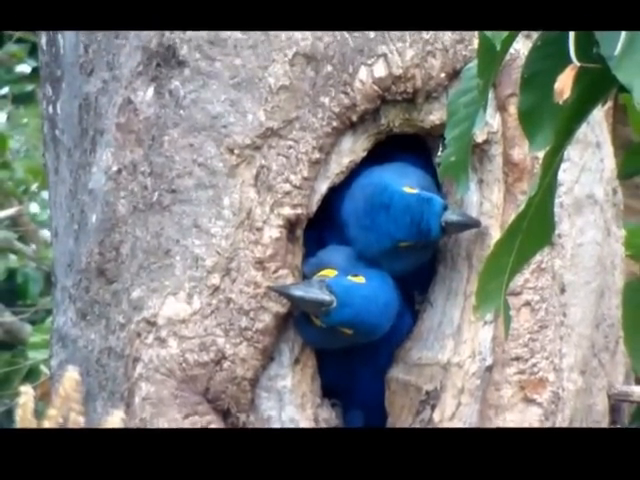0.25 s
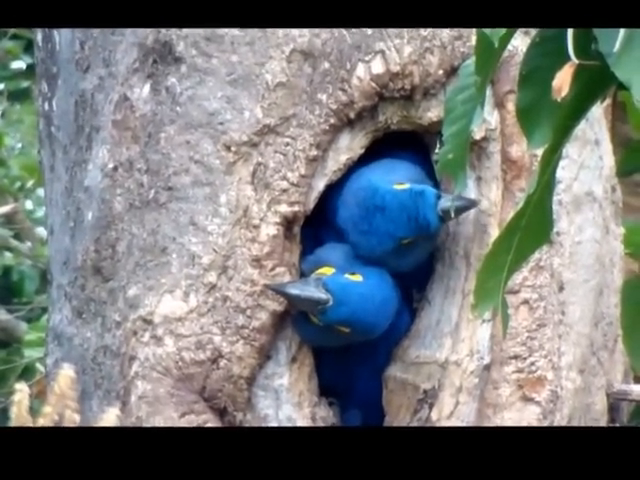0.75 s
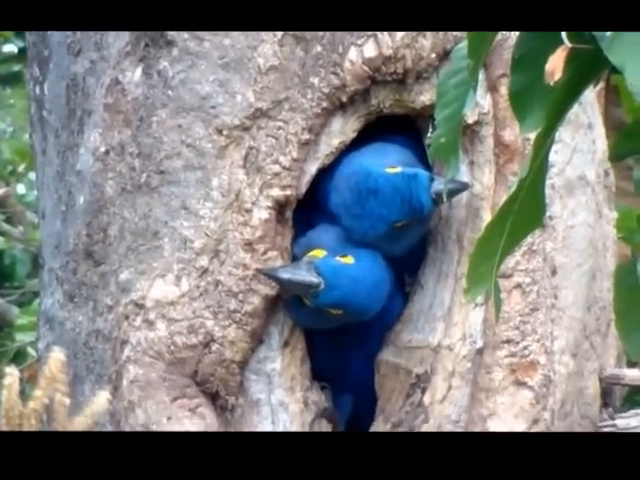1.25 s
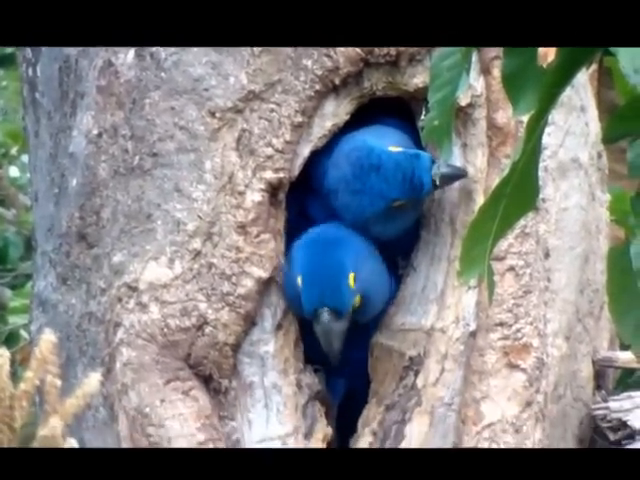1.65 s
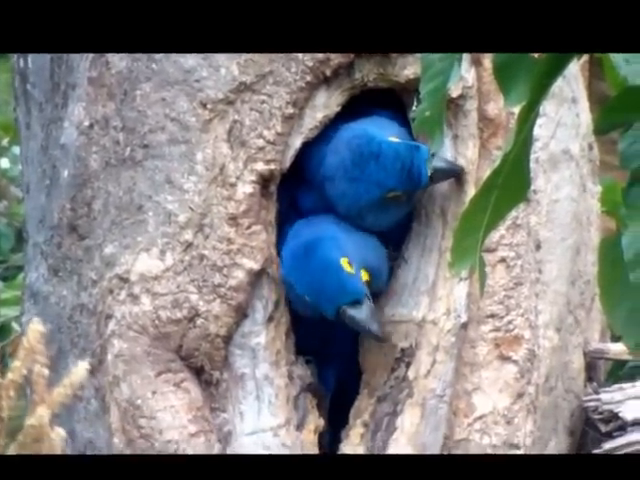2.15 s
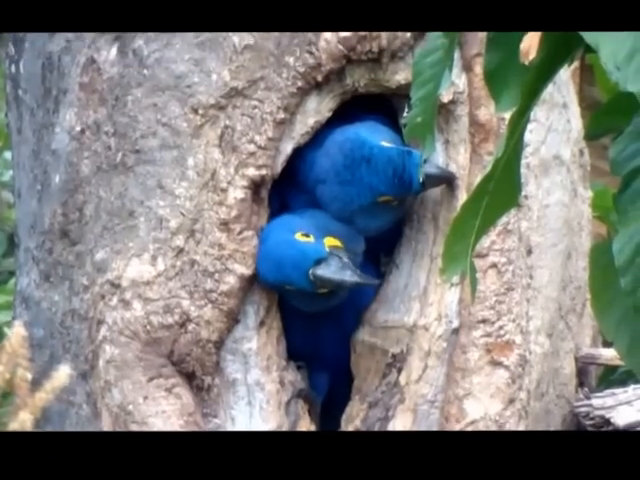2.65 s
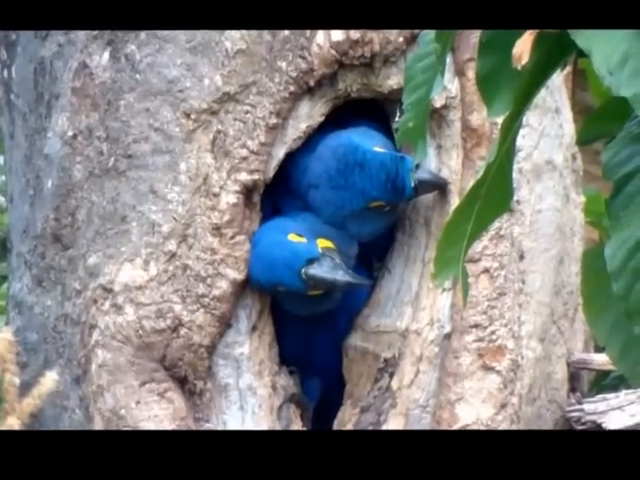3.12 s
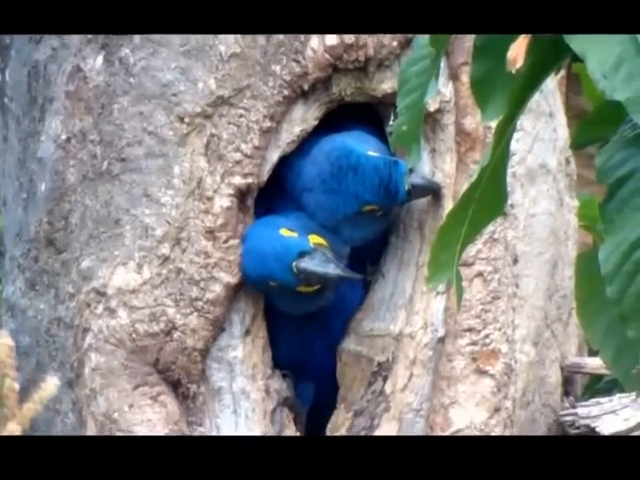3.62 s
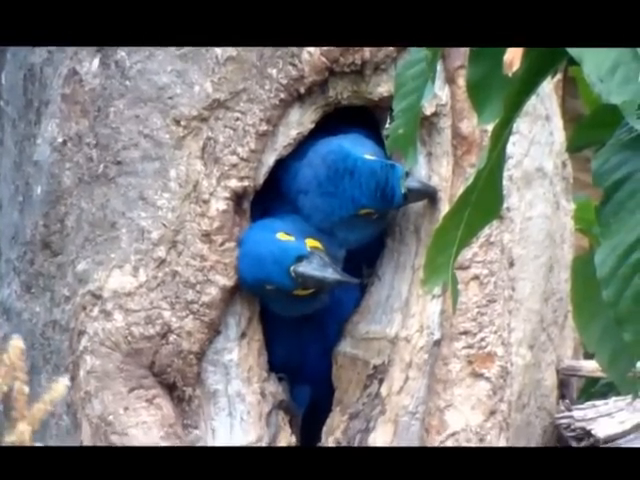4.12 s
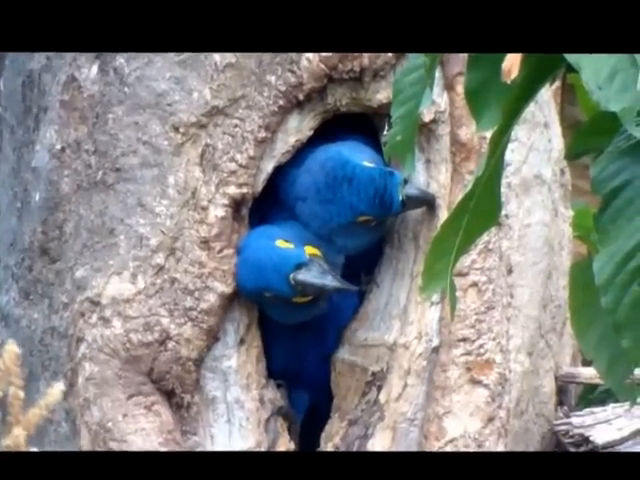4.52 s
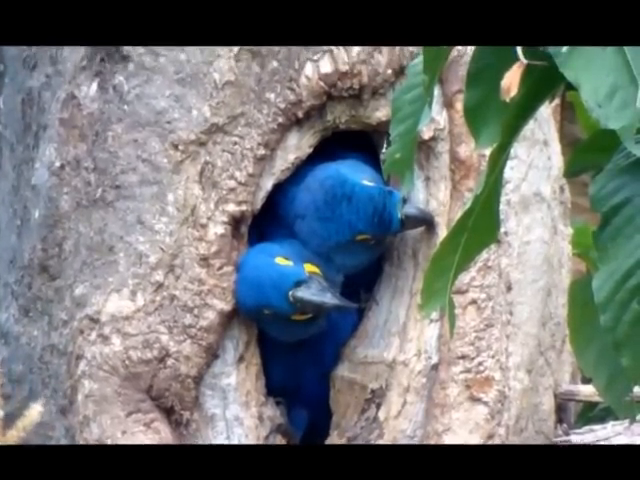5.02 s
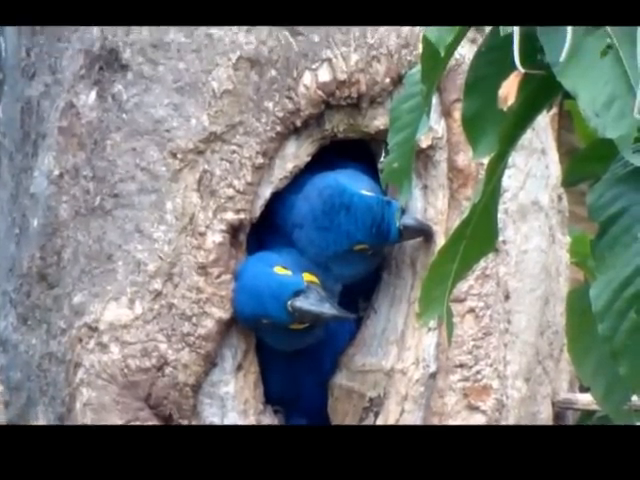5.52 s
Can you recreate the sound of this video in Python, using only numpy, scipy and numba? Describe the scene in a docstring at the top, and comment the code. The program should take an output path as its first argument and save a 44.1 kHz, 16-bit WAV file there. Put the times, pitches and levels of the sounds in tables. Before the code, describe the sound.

Harsh throbbing parrot croak near the start, then faint birds and farther parrots in a wood with chirping cricket, cicada buzz and wind thumps.

```python
"""In a wood, a parrot in a tree hole croaks loudly close to a small camera with two microphone ports.
Its voice, like those of farther parrots, is a pulse train shaped by resonances; songbirds whistle near-sines.
A cricket's keyed tone chirps in phrases over narrow cicada noise; leaves rustle as bursts of noise grains.
Low-passed noise and short pressure swings make wind rumble and thump on the ports."""
import sys
import numpy as np
from scipy import signal
from scipy.io import wavfile
from scipy.ndimage import uniform_filter1d
from numba import njit

SR = 44100
rng = np.random.default_rng(int(sys.argv[2]) if len(sys.argv) > 2 else 0)


def wav_out(sig):
    """Save sig, one row per channel (or a flat mono array), as 16-bit PCM at SR to the path in sys.argv[1]."""
    wavfile.write(sys.argv[1], SR, np.round(np.clip(np.atleast_2d(sig).T, -1, 1) * 32767).astype(np.int16))


N = 254010


def near_parrot():
    """Source and filter: throbs of the airway pinch the pulses, restart them high and let the pitch sag."""
    # membrane motion in a grunt, a croak and a yelp: (time [s], pulse rate [Hz], level [dB])
    call = [
        [(.315, 270.8, -54), (.325, 270.6, -35), (.341, 270.3, -27), (.349, 261.1, -43), (.357, 262, -42)],
        [(.36, 252.6, -20.5), (.372, 252.1, -15), (.395, 253.9, -13.5), (.43, 298.8, -11.5), (.53, 289.7, -12),
         (.68, 262.1, -14), (.775, 272.1, -10.5), (.792, 249.6, -22.5), (.885, 231.7, -26.5)],
        [(.894, 415.8, -26), (.91, 463.3, -27.5), (.93, 484.3, -29.5), (.95, 457.6, -25.5), (.98, 320, -26),
         (1.0, 394, -26), (1.028, 402.6, -26.5), (1.043, 357, -37), (1.052, 340, -64)],
    ]
    # roughness at the start of each part: (roughness [0-1])
    call_rough = [.64, .24, 0.16]
    # mouth: (time [s], throat [Hz], beak [Hz], beak level [dB], upper tract pitch [factor])
    mouth = [(.35, 1350, 2100, -22, 0.76), (.404, 1415, 2080, -15, 0.78), (.412, 1450, 2000, -18, 1.034),
             (.47, 1460, 1960, -19, 1.1), (.58, 1362, 2360, -14.5, 0.98), (.78, 1383, 2584, -12.5, 1.05),
             (.80, 1570, 2400, -52, 1.07), (.92, 1660, 1870, -11, 0.88), (1.05, 1624, 1940, -17, 0.99)]
    # upper resonances: (centre [Hz], width [Hz], level [dB])
    upper_tract = [(2625, 210, -22), (3570, 510, -18.5), (4390, 230, -28), (5250, 280, -25),
                   (6390, 470, -28), (7500, 680, -37.5), (9000, 5800, -46)]
    # airway constrictions in the croak: (time of the deepest point [s], depth of the dip [0-1])
    throbs = [(.408, 0.4), (.445, .35), (.481, 0.3), (0.516, 0.45), (.553, 0.2), (.587, 0.56), (0.621, 0.3),
              (.657, 0.26), (.692, 0.32), (.731, 0.6), (.768, 0.65)]
    throb_dip_s, throb_glide, throat_sag = .009, .09, .07  # glide and sag: share either side of the mean
    tires_per_s, roughest, tail_rough = 1.1, .43, .32
    throat_width_hz, beak_width_hz = 390, 300
    treble_start_db, treble_fades_s, treble_fade_db_per_s = -1.5, 0.846, 140

    t = np.arange(N) / SR
    hz, db, gate = read(sum(call, []))
    throat_hz, beak_hz, beak_db, stretch, _ = read(mouth)

    # the croak grows rougher up to a limit; the yelp is clear only on its arch
    grunt, croak, yelp = np.clip(call_rough, 0, 1)
    tired = np.clip(croak + tires_per_s * (t - throbs[0][0]), croak, roughest)
    grunt_end, lets_go, yelp_start = call[0][-1][0], call[1][-2][0], call[2][0][0]
    arch = (t > yelp_start) * (t < call[2][4][0])
    after_croak = np.where(arch, yelp, tail_rough)
    rough = np.where(t < grunt_end, grunt, np.where(t < lets_go, tired, after_croak))

    # the airway narrows gradually and reopens four times as fast
    start, depths = np.clip(np.transpose(throbs), 0, 1)
    airway = np.ones(N)
    for s, depth in zip(start, depths):
        dip_s = np.where(t < s, throb_dip_s, throb_dip_s / 4)
        airway *= 1 - depth * np.exp(-((t - s) / dip_s) ** 2)
    # position within a throb, held half-way (no glide) outside the throbs
    turn = np.interp(t, start, np.arange(len(throbs)), left=-.5, right=-.5) % 1
    sag = 1 - 2 * turn
    source, hum = syrinx(hz * (1 + throb_glide * sag), rough)
    throat_hz = throat_hz * (1 + throat_sag * uniform_filter1d(sag, size=200))

    # a third pole keeps the valley under the throat dark
    throat = svf(band(source, throat_hz, throat_width_hz), throat_hz, 530.0)
    voice = throat - undb(beak_db) * band(source, beak_hz, beak_width_hz)
    # torn air roughens the overtones
    rasp = source + 1.3 * rough * undb(4 * walk(200)) * rng.standard_normal(N)
    treble_db = treble_start_db - treble_fade_db_per_s * np.maximum(t - treble_fades_s, 0)
    voice += undb(treble_db) * tract(rasp, upper_tract, shift=0.027, wander_db=2.5, stretch=stretch)
    voice = voice / np.sqrt(uniform_filter1d(voice ** 2, size=2600)) * undb(db)

    # the chest hums about as loud whatever the effort, but drops 3 dB between croak and yelp
    chest = undb(-37.5 + 1.4 * walk(42.2)) * hum * airway
    chest = chest + level(band(source, 495, 260), -40.5)
    chest = chest * undb(-3 * (t > lets_go) * (t < yelp_start))
    chest = chest * undb(np.minimum(db + 26.0, 0))
    return (voice + chest) * airway * gate


def far_parrots():
    """Source and filter again: rougher pulses, throbbing in pitch and level, excite other throats."""
    # one list per call: (time [s], pulse rate [Hz], level [dB])
    calls = [
        [(3.335, 301, -49), (3.43, 314.2, -44), (3.47, 333, -36), (3.505, 311.4, -52), (3.58, 307.5, -56),
         (3.625, 302, -75)],
        [(4.455, 281.4, -55), (4.47, 279.7, -46), (4.502, 279.3, -48.5), (4.509, 280, -34.5),
         (4.62, 290.5, -35), (4.74, 271.9, -40), (4.87, 299.7, -36), (4.915, 300.7, -41.5)],
    ]
    # throat resonances, one list per call: (centre [Hz], width [Hz], relative level [dB])
    throats = [
        [(330, 180, -11.5), (1580, 205, -1.5)],
        [(618, 137, 7), (1117, 143, 4.5), (1460, 400, 4.5), (2080, 760, -4.5), (3650, 380, -11.5)],
    ]
    # roughness of each call: (roughness [0-1])
    roughness = [.75, .37]
    throb_mean_hz, throb_db = 28.74, 2
    out = 0
    for call, modes, rough in zip(calls, throats, roughness):
        hz, db, gate = read(call)
        throb = np.sin(2 * np.pi * np.cumsum(throb_mean_hz * (1 + 0.17 * walk(10))) / SR)
        source, _ = syrinx(hz * (1 + 0.04 * throb + .02 * walk(18)), rough)
        voice = level(tract(source, modes, shift=0.021, wander_db=1.1), 0)
        out = out + voice * undb(db + throb_db * throb) * gate
    return out


def songbirds():
    """Frequency modulation of near-sines: an arched note, a warble and slurred chirps, with early echoes."""
    # arched whistle: (time [s], pitch [Hz], level [dB], level of the line a fifth above [dB])
    arched = [(3.125, 2840, -64, -58), (3.146, 2980, -55, -49), (3.175, 3140, -50.5, -56),
              (3.24, 3265, -54, -45), (3.3, 3335, -52.5, -48.5), (3.39, 3224, -51, -44.5),
              (3.50, 3020, -57, -55), (3.64, 2680, -68, -56)]
    # a second bird's two notes, a flick and a trill settling on one pitch: (time [s], pitch [Hz], level [dB])
    warble = [
        [(3.67, 3000, -66), (3.7, 3400, -49), (3.715, 3400, -51), (3.73, 2800, -45), (3.82, 2710, -54),
         (3.85, 2710, -63)],
        [(3.86, 2900, -52), (3.897, 2965, -41), (3.925, 2200, -53), (3.965, 3203, -39), (4.035, 2205, -49.5),
         (4.078, 2756, -41.5), (4.15, 2738, -49), (4.21, 2735, -65), (4.24, 2730, -65)],
    ]
    # slurs: (time [s], length [s], from [Hz], to [Hz], level [dB], octave relative to it [dB])
    chirps = [(1.585, 0.087, 2250, 1703, -52.5, -1), (1.821, 0.067, 1800, 1860, -48, -3.5),
              (1.94, 0.046, 1300, 798, -52, 3.5), (2.135, 0.067, 2120, 1490, -51.5, -3),
              (2.778, 0.068, 2165, 1500, -54, 0), (3.437, .04, 4990, 4830, -49, -20),
              (3.546, 0.062, 3200, 2860, -48, -18), (5.631, 0.047, 2920, 2660, -48.5, -21),
              (5.564, 0.034, 4080, 4080, -52, -18), (5.645, 0.027, 4060, 4100, -51, -20),
              (5.72, 0.037, 3500, 3250, -50.5, -20)]
    # near trunks return the song: (delay [s], level [dB])
    echoes = [(.024, -11), (.047, -12.5)]
    hz, db, fifth_db, gate = read(arched)
    turn = whistle(hz, 0.0014)
    note_pair = undb(db) * np.sin(turn) + undb(fifth_db) * np.sin(turn * 3 / 2)
    out = gate * undb(1.2 * walk(37)) * note_pair
    for note in warble:
        hz, db, gate = read(note)
        out += gate * undb(db + 3.2 * walk(70)) * np.sin(whistle(hz, 0.00698))
    for s, length, from_hz, to_hz, chirp_db, octave_db in chirps:
        u = np.linspace(0, 1, int(length * SR))
        hz = to_hz + (from_hz - to_hz) * (1 - u) ** 1.4  # the slur slows toward its end
        turn = 2 * np.pi * np.cumsum(hz) / SR
        shape = undb(chirp_db) * np.sqrt(np.abs(np.sin(np.pi * u)))
        i = min(int(s * SR), N - len(u))
        out[i:i + len(u)] += shape * (np.sin(turn) + undb(octave_db) * np.sin(2 * turn))
    out = out * undb(2.35 * walk(60))
    delayed = [undb(db + 2.9 * walk(30)) * np.pad(out, (int(s * SR), 0))[:N] for s, db in echoes]
    return out + sum(delayed)


def cricket():
    """Amplitude keying: wing strokes gate a tone; each phrase starts slightly weak and flat and climbs to pitch."""
    # phrases: (start [s], length [s])
    phrases = [(-.2, 0.91), (0.929, 0.51), (1.944, 0.6), (3.016, 0.57), (4.117, .546), (5.22, 0.44)]
    tone_hz, stroke_rate_hz, start_drop = 6212, 34.3, 0.038  # drop: share of the pitch
    t, out = np.arange(N) / SR, 0
    for start, length in phrases:
        rise = np.clip((t - start) / 0.089, 0, 1)
        part = np.clip(((t - start) * stroke_rate_hz % 1) / 0.69, 0, 1)  # silent for the rest of the period
        stroke = np.clip(3.0 * np.sin(np.pi * part), 0, 1)
        hz = tone_hz * (1 - start_drop * (1 - rise) + 0.00296 * walk(120))
        gain = undb(-48.0794 - 1.65 * (1 - rise) + 0.96 * walk(50))
        gate = (t > start) * (t < start + length)
        out = out + gain * stroke * gate * np.sin(2 * np.pi * np.cumsum(hz) / SR)
    return out


def cicadas():
    """Amplitude-modulated narrow noise: one buzzing band that swells, over a broader chorus."""
    # swells: (centre time [s], half length [s], rise [dB])
    swells = [(1.003, 0.18, 5), (2.364, 0.19, 7), (3.7, 0.22, 7), (5.15, 0.49, 3)]
    t = np.arange(N) / SR
    db = -56.5 + sum(rise_db * np.exp(-((t - s) / half) ** 4) for s, half, rise_db in swells)
    buzz = np.sin(2 * np.pi * np.cumsum(43.6 * (1 + 0.059 * walk(5.2))) / SR)
    chorus_db = -54 + 1.0 * walk(3.32)
    chorus = undb(chorus_db) * around(5390 * (1 + 0.011 * walk(2.6)), 660, 0.99)
    return undb(db + 2.0 * buzz) * around(4670 * (1 + .006 * walk(3)), 295, 0.74) + chorus


def rustles():
    """Granular noise: brief bursts of dense leaf grains, partly alike on the two ports."""
    # bursts: (centre time [s], level [dB], length [s])
    bursts = [(1.241, -44, 0.019), (1.39, -49, 0.025), (1.433, -45.5, 0.04), (1.633, -53, 0.13),
              (1.685, -50, .02), (2.135, -53, 0.089)]
    t = np.arange(N) / SR
    shape = sum(undb(db) * np.exp(-((t - s) / (length / 2)) ** 2) for s, db, length in bursts)
    shared, *separate = rng.standard_normal((3, N)) * undb(1.94 * walk(340))
    grains = np.array([band(own + shared, 7500.0, 12000.0) for own in separate])
    return shape * level(grains, 0)


def wind():
    """Turbulent pressure: eddies rumble on each port alone; single gusts press the membranes about a cycle."""
    # thumps: (time 0.6 cycle ahead of the peak [s], peak level [dB], swing rate [Hz], left minus right [dB])
    thumps = [(1.549, -26, 212, 0), (2.545, -23, 111, -9), (3.118, -29.5, 70, 11),
              (3.968, -17.5, 76.5, 7.5), (4.26, -29, 67.3, 22), (4.309, -28, 98, 11),
              (4.347, -27, 62.3, -20), (4.565, -22, 74, 6), (4.786, -23, 64.84, -10), (5.08, -27, 65, 11),
              (5.204, -24.5, 58.5, 12), (5.62, -19, 126, -3)]
    low = signal.butter(1, [25, 90], "bandpass", fs=SR, output="sos")
    steep = signal.butter(2, 200, fs=SR, output="sos")
    lumps_db = 2.5 * np.array([walk(22.81), walk(25.12)])
    eddies = signal.sosfilt(np.vstack([low, steep]), rng.standard_normal((2, N)) * undb(lumps_db))
    out = level(eddies, 0) * undb(gusts() + np.array([[3.5], [1.5]]))
    for s, peak_db, hz, side_db in thumps:
        u = (np.arange(N) / SR - s) * hz - .6
        gain = undb(peak_db + np.array([[side_db], [-side_db]]) / 2)
        # the eddy reaches the second port out of step
        swing = np.array([-np.cos(2 * np.pi * u), np.cos(2 * np.pi * u - 1.4)])
        out += gain * np.exp(-(u / .5) ** 2) * swing
    return out


def gusts():
    """Wind envelope in dB, before the port offsets: calm, with gusts that rise fast, hold and die slowly."""
    # gusts: (time at full strength [s], held [s], level before the port offsets [dB])
    table = [(2.24, 0.19, -44), (3.95, .4, -34.5), (5.7, .2, -35.5)]
    calm_db, rise_db_per_s, fall_db_per_s = -51, 71, 12.5
    t, curves = np.arange(N) / SR, []
    for s, held, db in table:
        before, after = np.maximum(s - t, 0), np.maximum(t - s - held, 0)
        curves.append(np.maximum(db - rise_db_per_s * before - fall_db_per_s * after, calm_db))
    return np.max(curves, axis=0)


def wood():
    """Band-shaped noise: third-octaves of distant leaves and air swell together and flicker alone."""
    # spectrum: (frequency [Hz], relative density [dB per Hz])
    spectrum = [(150, -6), (400, -5), (1000, -9.5), (2500, -12), (4000, -15), (6500, -17.5), (9000, -21.5),
                (13000, -24), (15500, -28)]
    # leaf hiss over time: (time [s], level change [dB])
    stir = [(0, -1.5), (.8, 6), (1.6, 4.5), (2, 0), (5.76, 1.4)]
    corner_hz, density_db = np.transpose(spectrum)
    out, swell = 0, walk(0.69)
    for hz in 150 * 2 ** (np.arange(21) / 3):
        db = np.interp(np.log(hz), np.log(corner_hz), density_db) + 10 * np.log10(hz)
        db = db + 0.13 * swell + 1.52 * walk(9.5)
        side = np.interp(np.log(hz), np.log([200, 1000, 6000]), [.5, .4, .7])
        out = out + undb(db) * around(hz, hz / 4, side)
    return level(out, -49) * undb(read(stir)[0])


def syrinx(hz, rough):
    """Pulsed membrane: rough pulses wander in period and size and carry a puff of air; also the fundamental."""
    rough = np.clip(rough, 0, 1)
    cycles = np.cumsum(hz * (1 + 0.13 * rough * walk(150))) / SR
    chance = rng.standard_normal(N // 20)[cycles.astype(int)]  # one draw per cycle
    onsets = np.diff(np.floor(cycles), prepend=0)
    pulses = onsets * np.sqrt(SR / hz) * undb(4 * rough * chance)
    air = 2.4 * np.exp(-(cycles % 1) / .5) * rng.standard_normal(N)
    return np.sqrt(1 - rough ** 2) * pulses + rough * air, np.sin(2 * np.pi * cycles)


def tract(source, modes, shift=0, wander_db=0, stretch=1):
    """Parallel resonances of alternating sign; the tongue moves the lower ones, and each may drift a little."""
    tongue_reach_hz = 5000  # resonances from here up do not follow the tongue
    out = 0
    for k, (hz, width_hz, db) in enumerate(modes):
        gain = (-1) ** k * undb(db + wander_db * walk(13.44))
        centre_hz = hz * (stretch ** (hz < tongue_reach_hz) + shift * walk(7.6))
        out = out + gain * band(source, centre_hz, width_hz)
    return out


def whistle(hz, flutter):
    """Phase as the integral of frequency: a note with rounded turns and a slight flutter."""
    return 2 * np.pi * np.cumsum(uniform_filter1d(hz, 700) * (1 + flutter * walk(90))) / SR


def around(hz, width_hz, side):
    """Partial coherence: a noise band shared by both ports plus a part of opposite sign."""
    mid, rest = (level(band(rng.standard_normal(N), hz, width_hz), 0) for _ in range(2))
    return mid + side * rest * np.array([[1], [-1]])


def band(x, hz, width_hz):
    """Cascaded resonance: two wider band-passes in series give about the stated width and steeper skirts."""
    hz = hz * np.ones(N)
    return svf(svf(x + 1e-18, hz, 1.5 * width_hz), hz, 1.5 * width_hz)


@njit
def svf(x, hz, width_hz):
    """Second-order resonance: a state-variable band-pass with a moving centre, gain 1 at the centre."""
    y, b, l = np.empty(len(x)), 0., 0.  # b and l are the two integrator states
    for i in range(len(x)):
        g, k = np.tan(np.pi * hz[i] / SR), width_hz / hz[i]
        v = (b + g * (x[i] - l)) / (1 + g * (g + k))
        b, l, y[i] = 2 * v - b, l + 2 * g * v, k * v
    return y


@njit
def trees(x, lags, gain, damp):
    """Multiple scattering: eight delay lines feed each other, duller on every round."""
    line, soft, out = np.zeros((8, 8192)), np.zeros(8), np.zeros((2, len(x)))
    for i in range(len(x)):
        total = 0.
        for k in range(8):
            soft[k] += (1 - damp) * (gain[k] * line[k, (i - lags[k]) & 8191] - soft[k])
            total += soft[k]
            out[k % 2, i] += soft[k]
        for k in range(8):
            line[k, i & 8191] = x[i] + soft[k] - total / 4
    return out


def walk(rate):
    """Smoothed random process: levels held 1 / rate s and slewed twice; spread near 1."""
    k = int(SR / rate)
    held = np.repeat(rng.standard_normal(N // k + 1), k)
    return 1.3 * uniform_filter1d(uniform_filter1d(held, k), k)[:N]


def read(table):
    """Linear interpolation: columns of a curve table at every sample, and a gate open inside its span."""
    t, (s, *columns) = np.arange(N) / SR, np.transpose(table)
    return [np.interp(t, s, c) for c in columns] + [1. * (t >= s[0]) * (t <= s[-1])]


def level(x, db):
    """Root-mean-square scaling: bring a signal to an rms level in dB."""
    return x * undb(db) / np.sqrt(np.mean(x ** 2))


def undb(db):
    """Logarithmic amplitude: decibels to gain."""
    return 10 ** (np.asarray(db) / 20)


def scene():
    """Superposition: birds in front, scattered by the trunks; insects, leaves and wind around."""
    near, far, song = near_parrot(), far_parrots(), songbirds()
    scattered = undb(-23) * near + undb(-12) * far + undb(-11.5) * song
    # long waves bend round the trunks
    scattered = signal.sosfilt(signal.butter(2, 1300, "highpass", fs=SR, output="sos"), scattered)
    lags = rng.integers(500, 4500, 8)
    decay_s = 0.64  # to -60 dB, before the damping
    echo = trees(scattered, lags, undb(-60 * lags / SR / decay_s), 0.44)
    front = near + far + song + cricket() + 1.05 * echo.sum(axis=0)
    port_lag = 0.7  # samples by which the left port hears the front late
    left = port_lag * np.roll(front, 1) + (1 - port_lag) * front
    return np.array([left, front]) + 0.63 * echo + cicadas() + rustles() + wind() + wood()


def record(dry):
    """Saturation and band limiting: the preamplifier rounds the loudest peaks; the camera cuts the top."""
    rounded = np.tanh(.8 * dry) / .8
    return signal.sosfilt(signal.ellip(16, .5, 60, 15650, fs=SR, output="sos"), rounded)


dry = scene()
out = record(dry)
wav_out(out)
```